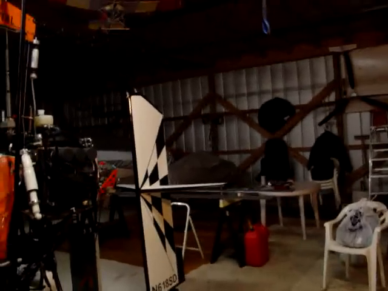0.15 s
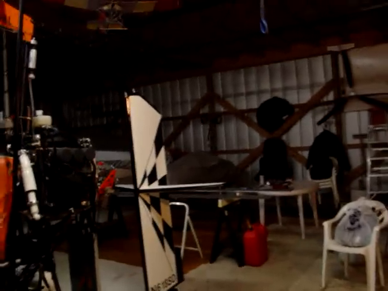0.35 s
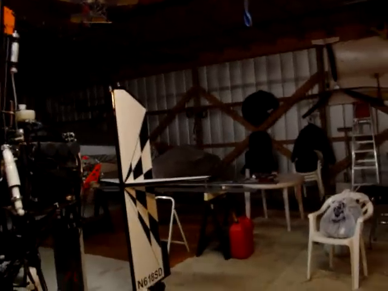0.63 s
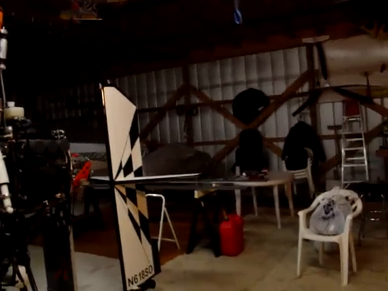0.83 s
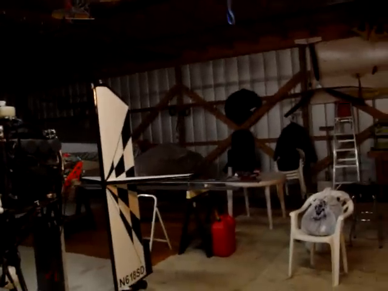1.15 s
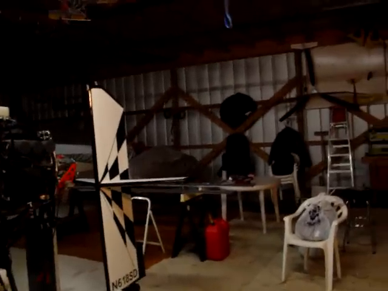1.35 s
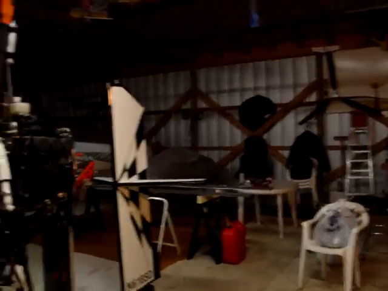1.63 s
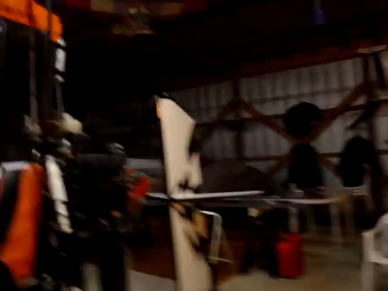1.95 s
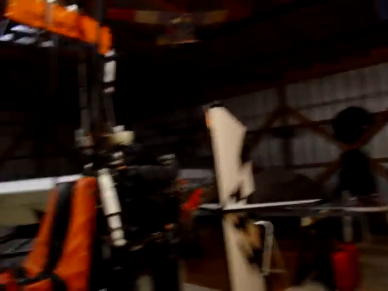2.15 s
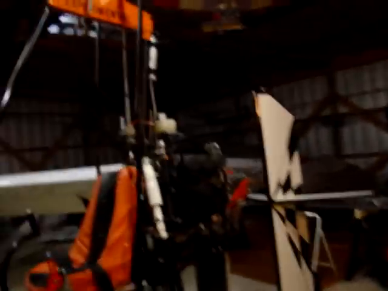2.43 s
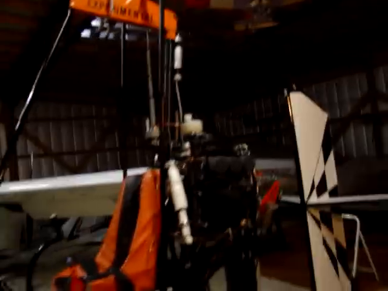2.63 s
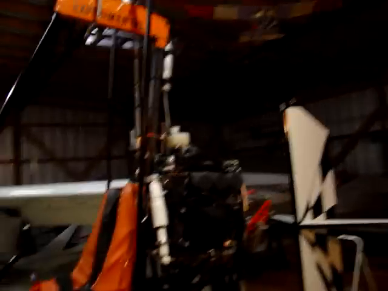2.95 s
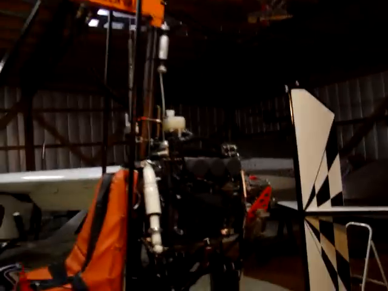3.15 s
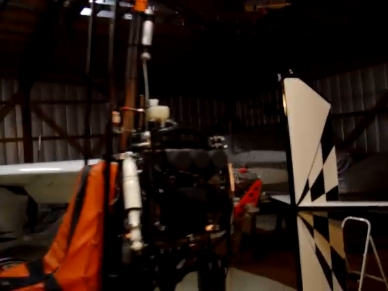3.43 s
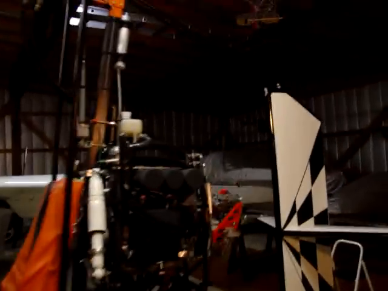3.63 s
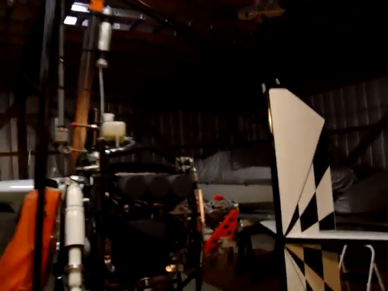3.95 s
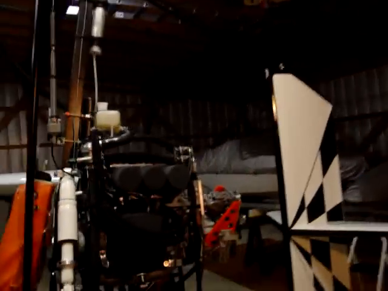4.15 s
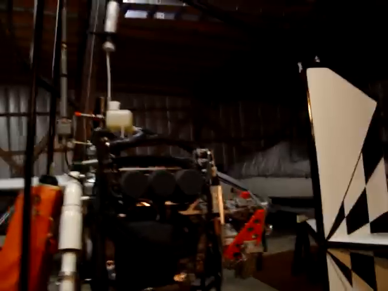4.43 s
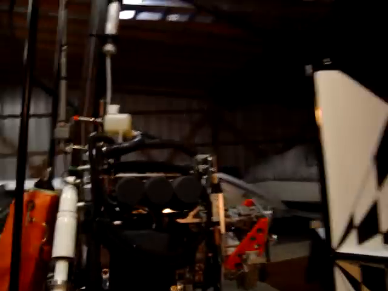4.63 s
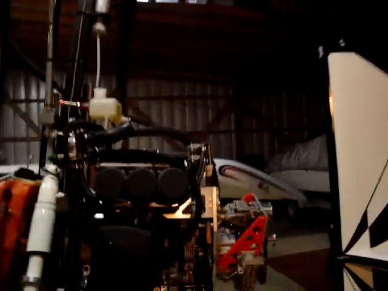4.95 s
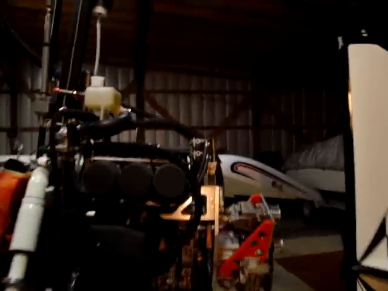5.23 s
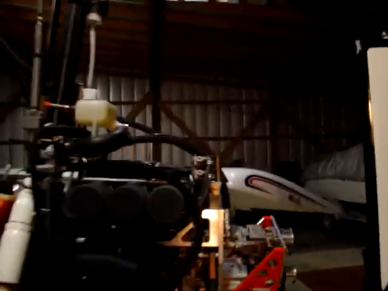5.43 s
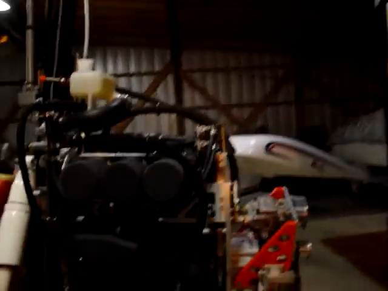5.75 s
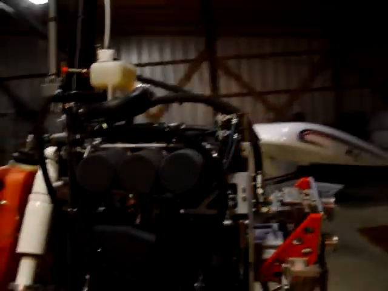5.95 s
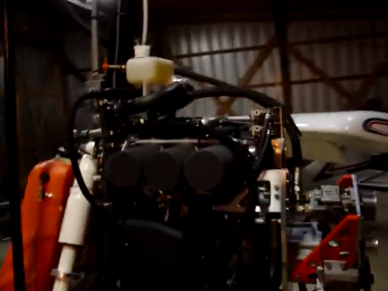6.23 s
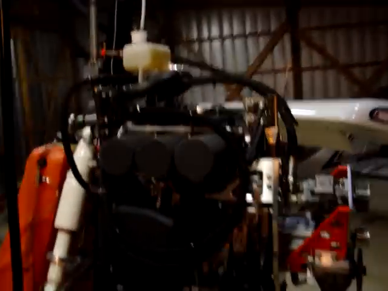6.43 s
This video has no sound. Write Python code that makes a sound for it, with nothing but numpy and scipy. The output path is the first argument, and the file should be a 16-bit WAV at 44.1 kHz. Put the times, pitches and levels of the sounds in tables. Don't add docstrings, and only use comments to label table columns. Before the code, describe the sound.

Rough, throbbing engine idle at close range, boomy and reverberant, with fluttering low-mid exhaust beats, breathy air hiss and rattling valve clatter.

```python
import sys
import numpy as np
from scipy import signal
from scipy.io import wavfile
from scipy.ndimage import uniform_filter1d

SR = 44100
rng = np.random.default_rng(int(sys.argv[2]) if len(sys.argv) > 2 else 0)


def bounce(signal):
    frames = np.transpose(np.atleast_2d(signal))
    limited = np.clip(frames, -1, 1)
    pcm = np.round(limited * 32767).astype(np.int16)
    wavfile.write(sys.argv[1], SR, pcm)


def how_loud(loudness_db):
    steps = np.asarray(loudness_db, float) / 20
    return 10 ** steps


N = 290486

# (frequency [Hz], level [dB])
PIPE_SPECTRUM = [(15, -37.5), (45, -37), (75, -25), (110, -7.5), (160, 0.5), (240, 13), (330, -10.5),
                 (430, 5), (480, -16.5), (600, -24), (740, -13), (1200, -36.5), (1800, -59), (3000, -110)]
# (width [Hz], level from behind [dB], level from the side [dB])
PIPE_MODES = [(8, -28.5, -28.5), (11.9, -19, -18.5), (18, -21, -18), (22, -17.5, -6.5), (20, -9, -28.5),
              (20, -14, -15.5), (25.1, -10.5, -34.5), (11.9, -16, -18), (60, -28.5, -18.5)]
PIPE_HZ = [60, 91, 128, 310, 350, 396, 445, 510, 740]
# (frequency [Hz], width [Hz], level [dB])
THUMP = [(214.8, 116, -1), (439, 223, -19.5), (99.4, 25, -15.5)]
# (frequency [Hz], level [dB])
HISS_SPECTRUM = [(2650, -8.5), (4500, -5), (6120, 3), (8260, 10.5), (8760, 5), (9900, -4), (12900, -38.5),
                 (21800, -120)]
# (frequency [Hz], level [dB])
BLOCK_SPECTRUM = [(350, 1), (600, -2), (740, -2.5), (1220, -7.5), (1950, -10), (2520, -10.5), (3330, -11.5),
                  (4630, -13.5), (6500, -16.5), (8450, -17.5), (14300, -120)]
# (width [Hz], level from behind [dB], level from the side [dB])
COVER_MODES = [(50.3, -14, -17), (306, -11.5, -18), (40, -18.5, -17), (90.5, -18.5, -14.5),
               (250, -16, -11.5), (35, -15, -21.5), (44.7, -19, -14.5), (49.7, -22, -19.5), (80, -24, -20),
               (540, -18, -12.5)]
COVER_HZ = [950, 1500, 1950, 2810, 3350, 3600, 3895, 4400, 4890, 5300]
# (frequency [Hz], decay by 60 dB [s])
HALL_T60 = [(60, 0.66), (250, 0.89), (1000, 2.8), (4000, 1.54), (9000, 0.21)]
# (time [s], gain toward block [dB], gain toward exhaust [dB])
FACING = [(0, -0.5, 1.5), (.35, 1.5, 1), (.9, -.5, 1.5), (1.1, 0.5, .5), (1.27, -2, -.5), (1.36, 1, 0),
          (1.8, 0, 0.1), (2.5, 0, 1), (2.65, 0, 0.5), (2.9, 0.6, 0.5), (3.3, 0, -1.5), (3.7, -0.5, -2.5),
          (3.95, 0, -1.6), (4.45, 0, -2), (5.1, 0, 0), (5.7, -0.24, -0.2), (6.59, -0.5, -1.5)]
# (time [s], lead over a steady beat [turns])
HUNT = [(0, .19), (.2, -.045), (.445, -.165), (.69, -.055), (.886, -.25), (1.2, -.514), (1.8, -.645),
        (1.95, -.72), (2.31, -.58), (2.715, -.475), (2.85, -.59), (3.3, -.66), (3.59, -.45), (4.03, -.42),
        (4.43, -.27), (5, -.33), (5.74, -.17), (6.59, -.11)]
# (time furthest behind [s], loss [turns], time spent slowing [s])
STUMBLES = [(.137, .08, .1), (.348, .21, .075), (.554, .3, .11), (.82, .14, .11), (1.099, .17, .075),
            (1.307, .22, .11), (1.509, .17, .107), (1.677, .105, .1), (1.882, .12, .073),
            (2.052, .16, .106), (2.12, .2, .068), (2.417, .115, .104), (2.553, .154, .04), (2.653, .16, .1),
            (3.215, .24, .09), (3.401, .24, .107), (3.697, .195, .07), (3.899, .18, .106), (4.1, .17, .072),
            (4.367, .19, .22), (4.533, .13, .105), (4.771, .15, .2), (4.905, .105, .1), (5.142, .18, .106),
            (5.615, .29, .17), (5.912, .13, .17), (6.348, .09, .1), (6.549, .07, .07)]
# (time [s], level [dB])
WEAK_BURNS = [(1.236, -6.5), (1.48, -2.5), (2.595, -2.5), (3.266, -2.5), (3.36, -4), (4.24, -2),
              (4.435, -3), (4.805, -2), (4.95, -6), (5.65, -6.5), (5.775, -4.5), (6.05, -4), (6.39, -3.5),
              (6.49, -4.5)]
# (delay at start [ms], delay at end [ms], turning time [s], level then [dB],
# bend [dB/s^2])
SURFACES = [
    (5.57, 5.95, 2.2, -4.5, -0.1853),
    (7.47, 7, 3.14, -1.5, -10.5),
    (13.05, 12.01, 2.3, -5, 0.6956),
    (14.94, 16.15, 3.4, -4, -5),
    (23.72, 23.35, 3.95, -2, -0.21),
    (26.62, 25.97, 4, 0, -5.5),
    (39.7, 39.8, 1.97, -21, 1),
    (65.6, 50, 1.4, -6, -1),
]
# (early frequency [Hz], late frequency [Hz],
# time loudest [s], level then [dB], fade [dB/s^2])
BOOMS = [(297, 212, 3.7, -1.5, -3.5), (176, 178, 4.2, -6, -4), (258, 256, 5.8, -11, -5),
         (245, 240, .9, -11, -5), (510, 510, .9, -17, -3), (262, 240, 3.3, -12, -2), (177, 178, 5, -16, -2),
         (243, 238, 4.45, -6, -12), (510, 510, .2, -19, -8), (510, 510, 1.55, -18, -8)]
# (time [s], peak level [dB])
SNAPS = [(0.2377, -18.5), (3.264, -19.5), (3.6611, -22.5), (3.795, -20), (3.864, -23), (3.896, -22),
         (3.9968, -18.5), (4.1647, -19.5), (4.2707, -20.5), (4.3385, -20), (4.4982, -18), (4.6688, -22),
         (4.7401, -22.5), (4.7721, -20), (4.804, -18.5), (4.8698, -22), (4.9706, -20), (5.2058, -22.5),
         (5.2717, -21), (5.3053, -22), (5.4081, -22), (5.4755, -18), (5.5089, -19), (5.5787, -23.5),
         (5.678, -19.5), (5.7743, -17), (5.8426, -19.5), (5.8775, -19.5), (5.913, -18.5), (5.9763, -19),
         (6.0102, -19.5), (6.11, -21.5), (6.1779, -14.5), (6.2114, -21), (6.2428, -18), (6.314, -25),
         (6.3495, -24), (6.3819, -21), (6.4472, -20.5), (6.55, -21)]
# (time [s], peak level [dB], frequency [Hz])
KNOCKS = [(0.1725, -23.5, 3490), (0.31, -23, 3890), (0.7462, -21, 3890), (1.8826, -20, 3360),
          (2.1829, -21, 2800), (2.9542, -20, 3270), (3.056, -23.5, 3660), (3.0894, -24, 3940),
          (3.6596, -21, 3600), (3.7638, -24, 3690), (4.0636, -25, 1730), (4.1, -22, 3390),
          (4.597, -22, 2730), (4.6319, -24.5, 3340), (4.7701, -22, 3860), (5.2056, -22, 2820),
          (5.3727, -21, 3250), (5.542, -25, 3890), (5.7758, -20, 3940), (5.8785, -21, 3920),
          (5.9743, -23, 3900), (5.9958, -21, 1670), (6.0447, -21, 3890), (6.1764, -19.5, 2830),
          (6.2437, -20, 3830), (6.2776, -23, 2850), (6.4138, -19, 2790)]
# (middle time [s], frequency [Hz], level [dB])
BUZZES = [(.395, 4740, -42), (.647, 5340, -43), (1.382, 3700, -33.5), (1.41, 3600, -35.5),
          (1.384, 4680, -40.5), (1.692, 4820, -41.5), (2.325, 4910, -37.5), (2.664, 3300, -38),
          (2.871, 1120, -39.5), (3.03, 4850, -40), (3.416, 1200, -41), (3.419, 1980, -39.5),
          (3.538, 4300, -42), (3.913, 1200, -38), (3.924, 1900, -39.5), (4.145, 4820, -41.5),
          (4.815, 4900, -40), (5.004, 4390, -39.5), (5.216, 2930, -39.5), (5.785, 4740, -39.5),
          (6.255, 3960, -38.5), (6.415, 2930, -37.5), (6.563, 4820, -42.5)]
# (frequency [Hz], width [Hz], time crossed [s], duration [s], level [dB])
SPOTS = [(268, 25, 0.45, 0.54, -5), (536, 38, 0.79, 1.1, -7), (492, 43, 0.89, 1.4, -8),
         (507, 12, .8, 0.66, 2.5), (345, 18, 1.3, 0.56, 2), (92, 13, 1.9, 1.3, 4),
         (582, 16, 2.1, 0.35, 3.5), (187, 25, 2.2, 0.26, 3.5), (260, 15, 2.7, .4, -2),
         (255, 24, 3.63, .3, 2.5), (241, 18, 4.7, 0.33, -0.5), (262, 25, 5.3, 0.46, 1),
         (3895, 100, .55, .3, 2), (3600, 80, 0.98, .8, 0), (340, 30, 3, 0.47, 3), (415, 65, 3.4, 1.2, 6),
         (109, 33, 3.5, 1.7, 3), (728, 25, 4.6, .8, -2), (510, 25, 4.3, 0.65, -1), (168, 20, 4.62, 0.35, 3),
         (203, 15, 4.2, 0.51, -7), (232, 15, 5.14, 0.41, -8), (530, 20, 4.1, 0.48, 2),
         (447, 14, 5.8, .8, 3), (680, 49, 5.8, 1.1, 5), (180, 15, 6.2, .4, 0.5), (3350, 250, 1.4, .4, -1),
         (3930, 100, 4.9, .5, -6), (2810, 220, 7.3, .7, 2.5), (213, 17, 3.17, .15, -7.5),
         (212, 15, 3.85, .15, -5), (181, 20, 5.36, .12, -2), (255, 25, 1, 0.17, 3),
         (475, 30, 4.45, .15, -6), (455, 30, 3.4, .3, -4), (226, 14, 5.75, 0.39, -3.5),
         (259, 20, 5.6, .5, 1.5), (510, 25, .36, .07, -3.5), (265, 20, 3.95, .12, -2.5),
         (200, 50, 1.5, 0.13, 2.5)]
# (frequency [Hz], width [Hz], time crossed [s], duration [s], level [dB])
NODES = [(494, 20, 0.1, 0.22, 5), (470, 20, 0.1, 0.22, -6.5), (289, 16, 0.19, 0.22, -5.0),
         (427, 22, 0.29, 0.22, 4.5), (107, 27, 0.46, 0.22, 5.0), (333, 20, 0.67, 0.17, -7.5),
         (364, 20, 0.88, 0.18, 5), (118, 24, 0.99, 0.29, -4), (470, 20, 1.23, 0.22, -5.5),
         (183, 25, 1.4, 0.22, 4.5), (355, 20, 1.47, 0.22, 6.5), (538, 20, 2.1, 0.22, -9),
         (493, 13, 2.14, 0.22, 5.5), (366, 20, 2.37, 0.2, -6.5), (396, 20, 2.43, 0.22, -5.0),
         (129, 13, 2.84, 0.22, -5), (441, 20, 2.93, 0.22, 8), (301, 20, 3.01, 0.22, 3.5),
         (376, 20, 3.02, 0.22, -5.0), (397, 20, 3.67, 0.22, -8.5), (484, 20, 3.83, 0.22, 5.5),
         (273, 20, 4.18, 0.17, -7.0), (107, 20, 4.3, 0.24, 5.5), (312, 18, 5.27, 0.2, -3),
         (405, 22, 5.61, 0.22, -6), (538, 20, 5.82, 0.22, 7.5), (450, 20, 6.21, 0.22, 4.5),
         (344, 20, 6.28, 0.22, -5.0), (308, 20, 6.29, 0.34, 5), (118, 20, 6.32, 0.22, -5.0)]
# (frequency
# [Hz], width [Hz], time crossed [s], duration [s], level [dB])
SHADES = [(8000, 3700, .2, .12, 1.5), (8000, 2600, 1.2, .2, -2), (8000, 3000, 2.6, 0.12, 2),
          (8000, 3000, 2.8, .1, -2.5), (8000, 3000, 3.1, .06, 1), (8000, 3000, 2.5, .12, -2),
          (8000, 3000, 5.3, .08, 1), (8000, 3000, 5, 0.055, 2.5), (8000, 3000, 5.9, .1, -1.7),
          (8000, 3000, 6.35, 0.084, 1.5), (3500, 2000, 0.3, .1, -0.7), (3500, 2000, 2, .2, 2),
          (3500, 2000, 4.87, .1, -2), (1600, 1200, 0.68, .2, -1), (1600, 1200, 3.2, .15, -1),
          (1600, 1600, 3.97, .08, 0.3), (1600, 1200, 5.3, .2, 2.1), (1600, 1200, 5.8, .1, 0),
          (71.6, 12, 3, 6, -7)]

FIRINGS_PER_S, CATCH_UP_TURNS_PER_S = 29.65, 2.3
EXHAUST_DB, INTAKE_DB, CLATTER_DB = -15.5, -35.5, -30
INTAKE_BEAM, CLATTER_BEAM = 0.87, 0.94
PUFF_HIDDEN, PUFF_SEEN = 0.28, 0.56
FILTERS_SHOW_S, FILTERS_TURN_S = 2.68, 0.92
DIRECT_DB, SECOND_ORDER_DB = 2.8, -38
BOOM_WIDTH_HZ, WEAK_SPAN_S = 8, 0.022
KNOCK_DB, KNOCK_T60_S = -7, 0.029
BUZZ_S, BUZZ_WIDTH_HZ = 0.017, 260


def evened(x):
    return x / np.sqrt(np.mean(x ** 2) + 1e-20)


def columns(rows):
    s, *values = np.transpose(rows)
    return [np.interp(np.arange(N) / SR, s, v) for v in values]


def read(points, hz):
    f, value = np.transpose(points)
    return np.interp(np.log(hz + 1), np.log(f + 1), value)


def coloured(x, points):
    size = 2 ** 14
    hz = abs(np.fft.fftfreq(size, 1 / SR))
    log_gain = np.log(how_loud(np.maximum(read(points, hz), -100)))
    taps = np.fft.ifft(np.exp(np.conj(signal.hilbert(log_gain)))).real
    return evened(signal.oaconvolve(x, taps[:size // 2])[:N])


def ring(x, hz, width, order=1):
    pole = np.exp((2j * np.pi * hz - np.pi * width) / SR)
    return evened(signal.lfilter([1], np.poly([pole] * order), x).imag)


def drifting(spread_db, count=12):
    knots = rng.standard_normal(count)
    return how_loud(spread_db * np.interp(np.arange(N), np.linspace(0, N, count), knots))


def hall(x):
    taps = np.zeros(SR)
    at = np.arange(500, SR - 20, 20)
    taps[at + rng.integers(0, 20, len(at))] = rng.choice([-1., 1.], len(at))
    hz, t, z = signal.stft(taps, SR, nperseg=1024)
    decay = how_loud(-60 * t / read(HALL_T60, hz)[:, None])
    tail = signal.istft(z * decay, SR, nperseg=1024)[1]
    warm = np.concatenate([x[:SR][::-1], x])
    return signal.fftconvolve(warm, tail / np.linalg.norm(tail))[SR:SR + N]


def walked(x):
    t = np.arange(N) / SR
    out = x
    for hz, width, s, lasting, db in SPOTS + NODES + SHADES:
        change = how_loud(db * np.exp(-((t - s) / lasting) ** 2)) - 1
        out = out + change * signal.lfilter(*signal.iirpeak(hz, hz / width, SR), x)
    return out


def echoed(x):
    now = np.arange(N)
    out = how_loud(DIRECT_DB) * x
    for from_ms, to_ms, s, db, bend in SURFACES:
        delay_ms = from_ms + (to_ms - from_ms) * now / N
        level = how_loud(np.maximum(db + bend * (now / SR - s) ** 2, -60))
        out = out + level * np.interp(now - delay_ms * SR / 1000, now, x)
    return out


def booms(drive):
    t, out = np.arange(N) / SR, 0
    decay = np.exp(-np.pi * BOOM_WIDTH_HZ / SR)
    for early_hz, late_hz, s, db, fade in BOOMS:
        hz = early_hz + (late_hz - early_hz) * t * SR / N
        turn = np.exp(2j * np.pi * np.cumsum(hz) / SR)
        wave = turn * signal.lfilter([1], [1, -decay], drive / turn)
        out = out + how_loud(db + fade * (t - s) ** 2) * evened(wave.real)
    return out


def firings(jitter_ms=0.37):
    lead, = columns(HUNT)
    t = np.arange(N) / SR
    lag = 0
    for s, lost, slowing in STUMBLES:
        lag = lag + np.interp(t, [s - slowing, s, s + lost / CATCH_UP_TURNS_PER_S], [0, lost, 0])
    turns = FIRINGS_PER_S * t + uniform_filter1d(lead - lag, size=900) + 1
    slips = np.interp(turns, np.arange(260), rng.standard_normal(260))
    return np.maximum.accumulate(turns + slips * jitter_ms * FIRINGS_PER_S / 1000)


def blows(turns, spread_db):
    whole = turns.astype(int)
    strength = how_loud(spread_db * np.clip(rng.standard_normal(260), -1.6, 1.6))[whole]
    return np.diff(whole, prepend=whole[0] - 1) * strength, strength


def puffs(turns, delay, decay):
    since = (turns - delay) % 1
    return (1 - np.exp(-since / 0.02)) * np.exp(-since / decay)


def frame_drone(turns):
    return how_loud(SECOND_ORDER_DB) * np.sin(4 * np.pi * uniform_filter1d(turns, size=6000))


def snaps():
    t = np.arange(N) / SR
    gate = sum(how_loud(db - 4600 * np.maximum(t - s, 0)) * (t >= s) for s, db in SNAPS)
    return how_loud(-8) * gate * coloured(rng.standard_normal(N), HISS_SPECTRUM)


def clatter():
    t, out = np.arange(2000) / SR, np.zeros(N + 2000)
    for s, db, hz in KNOCKS:
        fall = how_loud(db + KNOCK_DB - 60 * t / KNOCK_T60_S)
        out[round(s * SR):][:len(t)] += fall * np.sin(2 * np.pi * hz * t)
    noises = rng.standard_normal((len(BUZZES), len(t)))
    swell = np.exp(-((t - t.mean()) / BUZZ_S) ** 2)
    for (s, hz, db), noise in zip(BUZZES, noises):
        buzz = how_loud(db) * swell * ring(noise, hz, BUZZ_WIDTH_HZ)
        out[round((s - t.mean()) * SR):][:len(t)] += buzz
    return out[:N]


def intake(turns):
    hiss_db = INTAKE_DB + INTAKE_BEAM * columns(FACING)[0]
    seen = np.clip((np.arange(N) / SR - FILTERS_SHOW_S) / FILTERS_TURN_S, 0, 1)
    share = np.clip(PUFF_HIDDEN + (PUFF_SEEN - PUFF_HIDDEN) * seen, 0, 1)
    _, strength = blows(turns, 2.3)
    gulp = puffs(turns, 0.03, 0.6) + 1.4 * puffs(turns, 0.07, 0.03)
    gate = 1 - share + share * strength * evened(gulp)
    flutter = drifting(1.0, count=60)
    return how_loud(hiss_db) * flutter * coloured(gate * rng.standard_normal(N), HISS_SPECTRUM)


def valve_gear(turns):
    clatter_db = CLATTER_DB + CLATTER_BEAM * columns(FACING)[0]
    _, strength = blows(turns, 2.2)
    busy = .8 + strength * evened(puffs(turns, 0.016, 0.34))
    struck = rng.random(N) < 4500 * busy / SR
    force = how_loud(2.34 * np.minimum(rng.exponential(1, N), 4))
    ticks = struck * force * rng.standard_normal(N)
    part = rng.integers(0, len(COVER_MODES) + 1, N)
    rush = 0.17 * evened(ticks * (part == len(COVER_MODES)))
    rush = rush + (1 + 0.031 * busy) / 2 * rng.standard_normal(N)
    side = np.arange(N) / N
    rings = 0
    for k, (hz, (width, behind_db, side_db)) in enumerate(zip(COVER_HZ, COVER_MODES)):
        level = how_loud(behind_db + side * (side_db - behind_db))
        rings = rings + level * drifting(1.5) * ring(ticks * (part == k), hz, width)
    return how_loud(clatter_db) * evened(coloured(rush, BLOCK_SPECTRUM) + rings)


def exhaust(turns):
    t = np.arange(N) / SR
    clicks, strength = blows(turns, 0.86)
    weak_db = sum(db * np.exp(-((t - s) / WEAK_SPAN_S) ** 2) for s, db in WEAK_BURNS)
    clicks = clicks * how_loud(weak_db)
    level_db = EXHAUST_DB + columns(FACING)[1]
    thump = -sum(how_loud(db) * ring(clicks, hz, width, order=2) for hz, width, db in THUMP)
    gas = (0.24 + evened(puffs(turns, 0.0052, 0.73))) * rng.standard_normal((2, N))
    rush = coloured(.5 * evened(clicks) + evened(gas[0]), PIPE_SPECTRUM)
    drive = evened(clicks) + .9 * evened(gas[1])
    side = np.clip((t - 1.8) / 2.4, 0, 1)
    modes = 0
    for hz, (width, behind_db, side_db) in zip(PIPE_HZ, PIPE_MODES):
        level = how_loud(10.0 + behind_db + side * (side_db - behind_db))
        modes = modes + level * ring(drive, hz, width)
    near = evened(echoed(thump)) + booms(thump + .25 * evened(thump) * gas[0])
    near = near + how_loud(-9.5) * evened(rush + modes)
    return how_loud(level_db) * evened(near + how_loud(-7.5) * hall(near))


def scene():
    turns = firings()
    gear = valve_gear(turns) * drifting(0.85, count=45)
    parts = frame_drone(turns) + snaps() + intake(turns) + gear + exhaust(turns)
    return (walked(parts) + clatter())[None]


def starved(x, from_hz=5100, under_db=-2.7, cut_db=-26):
    hz, _, z = signal.stft(x, SR, nperseg=256)
    power = uniform_filter1d(abs(z) ** 2, size=2, axis=1)
    bands = power[:128].reshape(32, 4, -1).mean(1)
    weak = bands < uniform_filter1d(bands, size=60, axis=1) * how_loud(2 * under_db)
    weak = np.repeat(weak, 4, 0) & (hz[:128, None] > from_hz)
    z[:128] *= np.where(weak, how_loud(cut_db), 1)
    return signal.istft(z, SR, nperseg=256)[1][:N]


def top_cut(x):
    return signal.sosfilt(signal.butter(12, 10050, fs=SR, output="sos"), x)


def record(dry):
    thin = signal.sosfilt(signal.butter(3, 80, "high", fs=SR, output="sos"), dry[0])
    thin = thin + how_loud(-52.0) * ring(rng.standard_normal(N), 23, 40)
    rounded = starved(1.144 * np.tanh(thin))[None]
    band_limit = signal.firwin(511, 10150, window=("kaiser", 9), fs=SR)
    limited = signal.oaconvolve(rounded, band_limit[None], "same")
    return top_cut(limited)


dry = scene()
out = record(dry)
bounce(out)
```